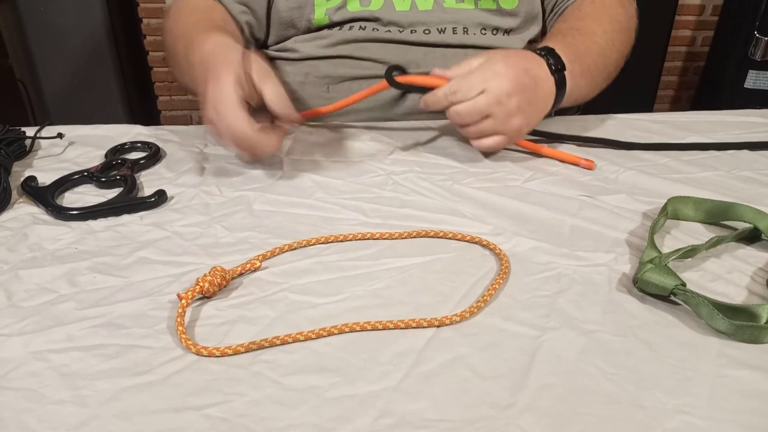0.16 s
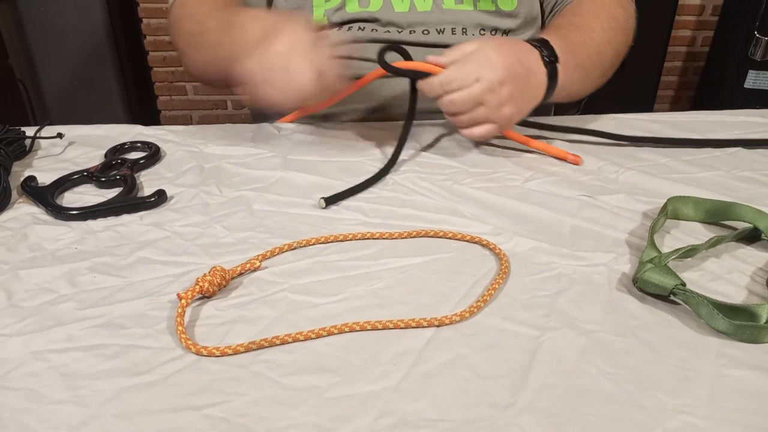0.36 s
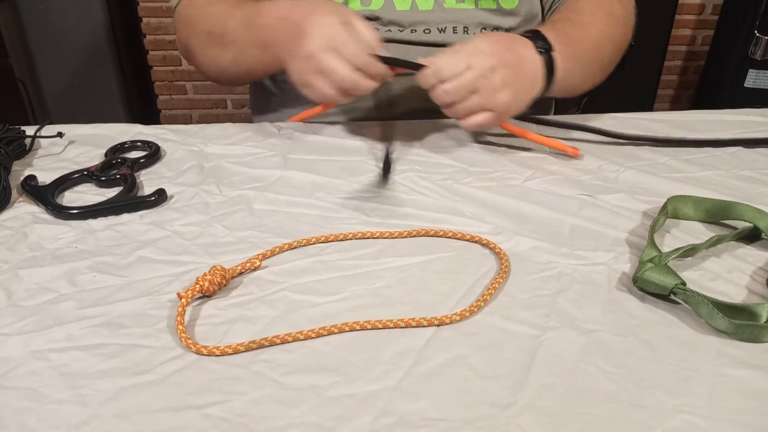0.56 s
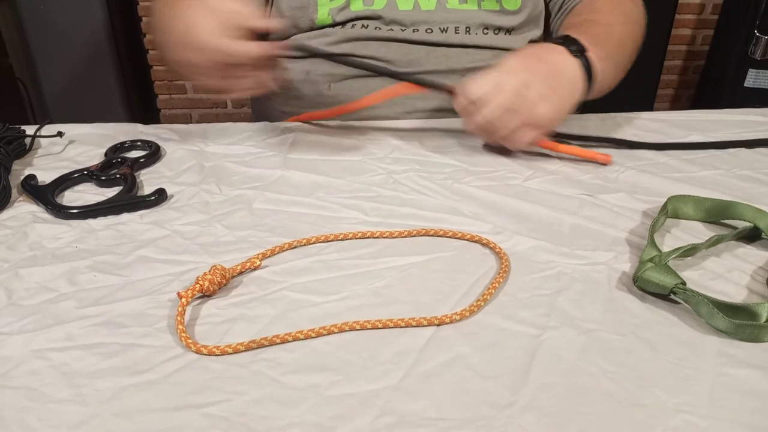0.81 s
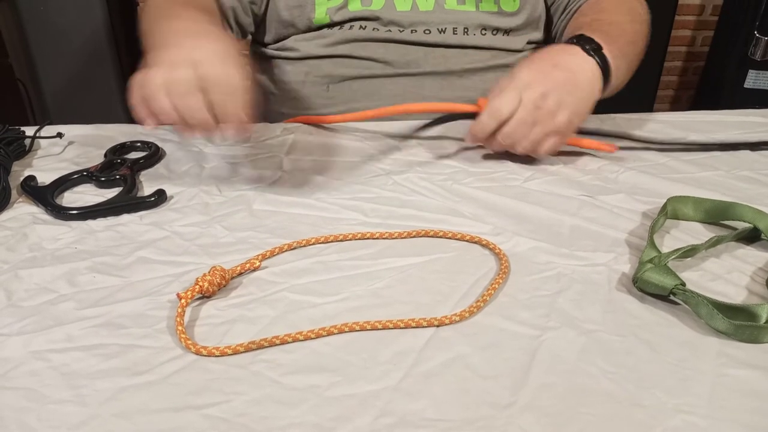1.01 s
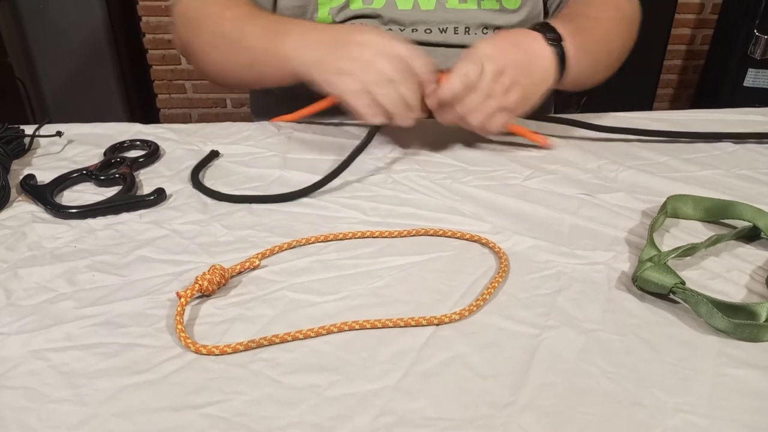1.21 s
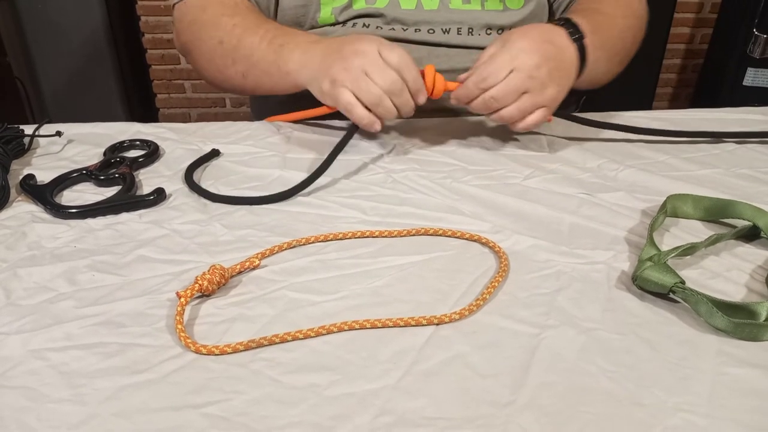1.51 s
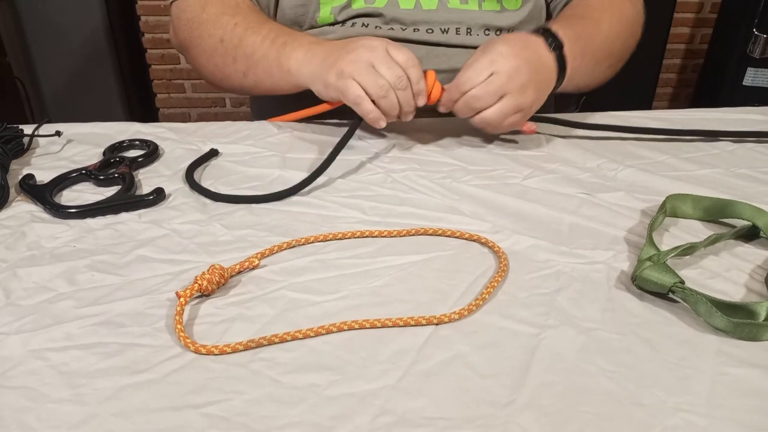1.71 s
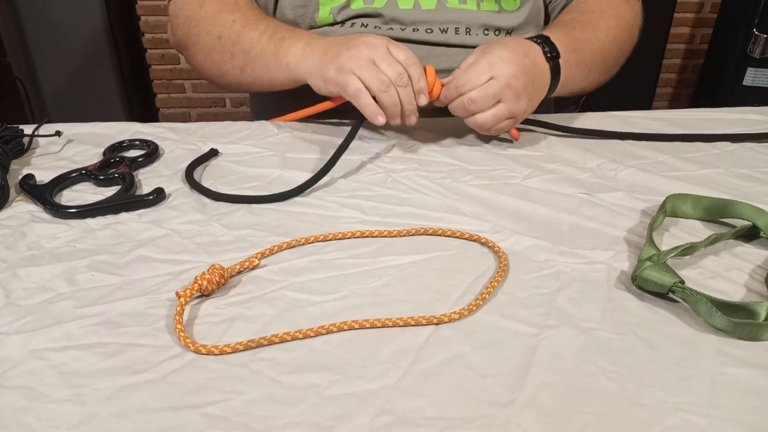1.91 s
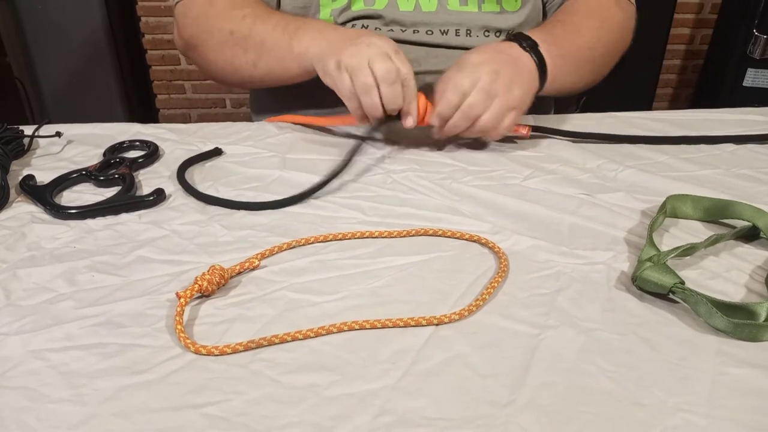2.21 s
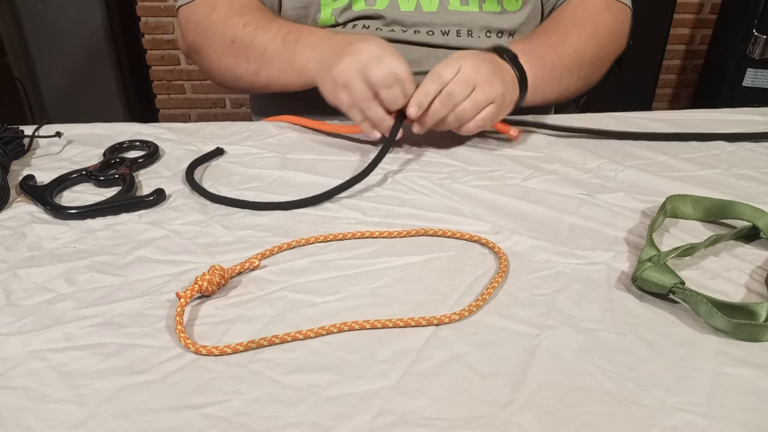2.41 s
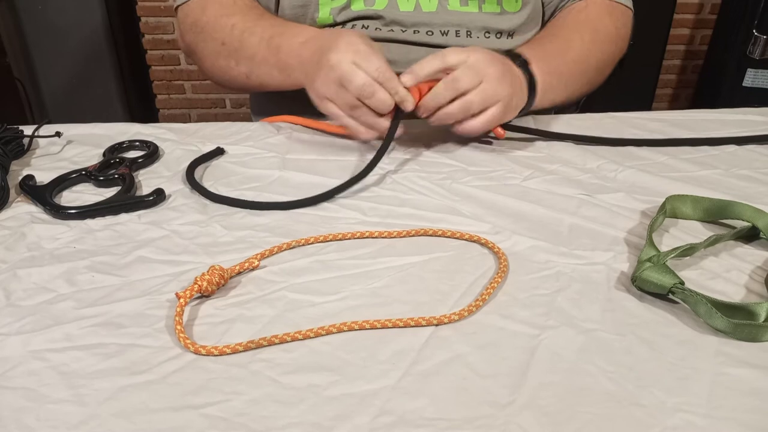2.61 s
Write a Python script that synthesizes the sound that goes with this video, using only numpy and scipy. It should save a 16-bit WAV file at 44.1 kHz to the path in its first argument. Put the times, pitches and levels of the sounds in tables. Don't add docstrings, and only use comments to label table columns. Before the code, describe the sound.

Loose rope ends drop onto a tabletop in two short bursts of hollow knocks, with a brief thin zip of sliding braid before the second, then mostly soft rustling and a few light taps; quiet, dry indoor room.

```python
import sys
import numpy as np
from scipy import signal
from scipy.fft import rfft, irfft
from scipy.io import wavfile
from scipy.ndimage import uniform_filter1d

SR = 44100
rng = np.random.default_rng(int(sys.argv[2]) if len(sys.argv) > 2 else 0)


def log_audio(samples):
    frames = np.atleast_2d(samples).T
    limited = np.clip(frames, -1, 1)
    pcm = np.round(limited * 32767).astype(np.int16)
    wavfile.write(sys.argv[1], SR, pcm)


def rack_gain(trim_db):
    fader = np.asarray(trim_db, float)
    return 10 ** (fader / 20)


N = 121275
T = np.arange(N) / SR

# start_s, body_db, boom_db, knock_db, damping (share of full ring time)
LANDINGS = [(.199, -47.5, -52, -59, .4), (0.206, -27.5, -23, -42, 0.68), (.218, -25, -33, -41, 0.57),
            (.24, -36.5, -24, -68, 0.34), (0.284, -44.5, -40, -70, 0.93), (.31, -53.5, -63.5, -67, .9),
            (0.428, -73, -47.5, -89, 0.75), (.551, -46.5, -44, -74, 0.88), (0.585, -49.5, -40, -54, 0.65),
            (.571, -58, -57, -75, .7), (.608, -48.5, -57, -69, .7), (.628, -68, -78, -72, .6),
            (.651, -57, -70, -60.5, .5), (0.737, -58.5, -67, -55, .8), (.808, -58, -53.5, -70, .6),
            (0.823, -47, -37, -55.5, 0.73), (0.871, -65.5, -49, -79, 0.74), (.945, -65, -63, -89, .6),
            (1.009, -51, -57, -54, .3), (1.014, -28.5, -28, -42, 0.72), (1.036, -33, -47, -49, 0.27),
            (1.0638, -25, -30.5, -36, 0.46), (1.115, -44.5, -41.5, -58, 0.79),
            (1.158, -48.5, -44.5, -54.5, 0.47), (1.51, -56, -67, -66, 0.45),
            (1.5305, -41.5, -36, -49, 0.69), (1.598, -63, -52, -93, 0.87), (1.7495, -41, -49.5, -95, 0.92),
            (1.788, -86, -42, -103, 0.41), (2.218, -63, -89, -71.5, 0.74), (2.43, -50, -51, -71, 0.65),
            (2.4379, -36, -30, -42.5, 0.58), (2.488, -55, -67.5, -73, .9), (0.038, -67, -80, -69, 0.3)]
# mode_hz, level_db, t60_s
BOOM_MODES = [(112, -23, 0.05), (138.2, 4.5, 0.22), (185.6, 1.5, 0.17), (232, -1, 0.24), (265, 3.5, 0.17),
              (301.8, 7.5, 0.15), (333.5, 0, 0.16)]
# mode_hz, level_db, t60_s
BODY_MODES = [(376, -2, .14), (411, 4, .16), (466, -2, .14), (535, 0, .15), (569, 4, .12), (600, 3, .11),
              (690, 1, .12), (785, -1, .13), (819, -4, .15), (891, -4, .13), (941, -3, .12),
              (1052, -6, .11), (1130, -9, .1), (1210, -11, .09)]
# mode_hz, level_db, t60_s
KNOCK_MODES = [(1308, 9.5, .07), (1450, 5.5, 0.12), (1604, -2.5, 0.12), (1850, -12, .1), (2000, -2, .1),
               (2090, 3, .11), (2160, 2, .12), (2340, 10, .055), (2440, 0, .1), (2510, 3, .12),
               (2654, 8, .045), (2730, -3.5, 0.11), (2860, -9, 0.14), (2945, -13, 0.093)]
# start_s, level_db, colour_hz, length_s
TIP_CLICKS = [(0.149, -67, 9300, 0.0032), (0.206, -42, 8900, 0.0042), (0.2184, -23.5, 8030, 0.0014),
              (0.2255, -34, 6500, 0.003), (.233, -42, 6800, .006), (0.586, -49.5, 4100, 0.0047),
              (.65, -46.5, 5900, 0.015), (0.737, -41, 2560, 0.00055), (0.742, -40.5, 2600, 0.003),
              (1.014, -54, 7400, .012), (1.0641, -23.5, 7400, 0.00097), (1.067, -23, 2780, 0.0065),
              (1.362, -64, 4200, .01), (1.488, -60, 6000, .006), (1.928, -55.5, 10500, .006),
              (2.0604, -62, 9700, .003), (2.068, -53, 9700, 0.005), (2.12, -56, 10500, .006),
              (2.157, -60, 6600, .006), (2.196, -45.5, 7400, 0.003), (2.219, -58, 6800, 0.003),
              (2.4036, -60, 9500, .005), (2.54, -63, 10500, 0.0036), (2.6585, -60, 7000, .005),
              (2.31, -61.5, 7100, 0.0051), (2.441, -47.5, 4560, 0.0084)]
# peak_s, level_db, rise_s, fall_s, colour_hz
BRAID_STROKES = [(0.044, -55, 0.039, 0.033, 11940), (0.148, -64, 0.025, 0.0093, 12500),
                 (.43, -64.5, .03, 0.044, 9700), (0.531, -58.5, 0.062, 0.026, 11200),
                 (0.591, -55, .04, 0.078, 10400), (.67, -57.5, .03, 0.15, 7900),
                 (.745, -56.5, 0.024, 0.15, 10500), (0.848, -68, 0.072, 0.017, 9200),
                 (1.119, -58.5, 0.061, 0.084, 8100), (1.2, -62, 0.012, 0.051, 9800),
                 (1.339, -63, 0.07, 0.14, 9000), (1.51, -62.5, 0.03, 0.042, 8330),
                 (1.62, -64.5, 0.024, 0.03, 9800), (1.685, -63, .015, 0.025, 10500),
                 (1.43, -77.5, .03, .02, 10500), (1.937, -60, 0.0069, .02, 10800),
                 (1.961, -55, 0.01, 0.018, 8000), (2.074, -63, 0.0079, .03, 10100),
                 (2.139, -59, 0.016, 0.07, 11600), (2.21, -78, 0.09, 0.21, 8100),
                 (2.32, -61, 0.0091, .03, 7900), (2.45, -57.5, 0.036, 0.066, 10000),
                 (2.561, -57, 0.015, .02, 11600), (2.626, -69, .01, 0.015, 8000),
                 (2.69, -56.5, 0.032, 0.021, 8000)]
# time_s, ridges_per_s, level_db
RIDGE_SLIDE = [
    (.86, 374, -20),
    (.9, 378, -2),
    (.94, 382, -2),
    (.97, 401, 0),
    (.995, 411, 0),
    (1.02, 403, 0),
    (1.05, 387, -2),
    (1.075, 378, -15),
]
# centre_hz, width_hz, level_db
FRICTION_BANDS = [(4400, 1200, -95), (6600, 1400, -83.5), (10400, 2600, -81), (12600, 1200, -89.5),
                  (15000, 1500, -95)]
# time_s, level_db
FINGER_ACTIVITY = [(0, 9), (.19, -2), (.38, -2), (.6, 11), (.88, -3.5), (.98, -7), (1.1, 11.5), (1.4, -13),
                   (1.56, -3), (1.8, 5), (1.91, -3), (2.03, -4), (2.25, 8.5), (2.38, -3), (2.5, 5),
                   (2.6, 1.5), (2.75, 4)]
# centre_hz, t60_s
ROOM_DECAY = [(120, 0.23), (500, 0.14), (2500, 0.2), (7000, 0.23), (13000, 0.037)]
# freq_hz, density_db_per_hz
HUSH_SPECTRUM = [(25, -15), (60, 0), (117, -0.5), (400, -8.5), (1700, -21), (3800, -25), (8000, -35.5),
                 (16000, -38)]
# freq_hz, gain_db
MIC_RESPONSE = [(3500, 1.5), (5200, 4), (6700, 7), (8200, -9), (10300, 7), (11800, 2), (13700, -5.5),
                (15300, 3)]


def unit(x):
    return x / np.sqrt(np.mean(x ** 2))


def curve(points, hz):
    p = np.array(points, float)
    return np.interp(np.log(np.maximum(hz, 1)), np.log(p[:, 0]), p[:, 1])


def colour(x, points):
    log_gain = curve(points, np.fft.rfftfreq(4096, 1 / SR)) * np.log(10) / 20
    cepstrum = irfft(log_gain)
    cepstrum[1:2048] *= 2
    cepstrum[2049:] = 0
    impulse = irfft(np.exp(rfft(cepstrum)))
    return signal.fftconvolve(x, impulse)[:len(x)]


def reson(x, hz, width_hz):
    b, a = signal.iirpeak(min(hz, .45 * SR), hz / width_hz, fs=SR)
    return signal.lfilter(b, a, x)


def walk(rate_hz):
    k = int(SR / rate_hz)
    steps = np.repeat(rng.standard_normal(N // 50), k)[:N]
    return unit(uniform_filter1d(uniform_filter1d(steps, k), k))


def crackle(grain_db):
    return rng.standard_normal(N) * rack_gain(grain_db * rng.exponential(size=N))


def ring(hz, db, t60_s, rise_s, chance):
    scatter_db, slur_rad, drift = 1.5, .4, .02
    t = T[:SR // 4, None]
    phase = 2 * np.pi * hz * (1 + drift * chance[2]) * t + slur_rad * chance[0]
    waves = np.sin(phase) * rack_gain(db + scatter_db * chance[1] - 60 * t / t60_s)
    onset = 1 - np.exp(-(t[:, 0] / rise_s) ** 2)
    return waves.sum(axis=1) * onset / np.sqrt(len(hz))


def thumps():
    below_share = .35
    # modes, rise_s, heart_hz (where soft landings gather), focus_db (lost per octave away)
    parts = [(np.array(BOOM_MODES).T, 0.0016, 150, 7),
             (np.array(BODY_MODES).T, 0.00063, 540, 9),
             (np.array(KNOCK_MODES).T, 0.00064, 2330, 35)]
    out = np.zeros(N + SR)
    chance = rng.standard_normal((40, 3, 3, 14))
    for (start_s, body_db, boom_db, knock_db, damping), luck in zip(LANDINGS, chance):
        soft = np.clip((-30 - body_db) / 10, 0, 1)
        i = int(start_s * SR)
        levels_db = (boom_db, body_db, knock_db)
        for (modes, rise_s, heart_hz, focus_db), level_db, draw in zip(parts, levels_db, luck):
            hz, mode_db, t60_s = modes
            octaves = np.log2(hz / heart_hz)
            loss_db = focus_db * soft * np.maximum(octaves, -below_share * octaves)
            db = mode_db + level_db - loss_db
            sound = ring(hz, db, t60_s * max(damping, .1), rise_s * (1 + soft), draw[:, :len(hz)])
            out[i:i + len(sound)] -= sound
    return signal.sosfilt(signal.butter(3, 105, "high", fs=SR, output="sos"), out[:N])


def ticks():
    snap_s = .004
    out = np.zeros(N + SR)
    patters = rng.standard_normal((40, SR // 20))
    for (start_s, db, hz, length_s), patter in zip(TIP_CLICKS, patters):
        impacts = np.r_[-snap_s / length_s, patter]
        decay = np.exp(-np.arange(len(impacts)) / (max(length_s, 2e-4) * SR))
        width_hz = hz * (.18 + .0005 / length_s)
        click = reson(reson(impacts * decay, hz, width_hz), hz, hz * 1.8)
        i = int(start_s * SR)
        out[i:i + len(click)] += rack_gain(db) * click
    return out[:N]


def rustle():
    grain_db, flicker_db = 2.0, 2.5
    grains = unit(crackle(grain_db)) * rack_gain(flicker_db * walk(60))
    out = np.zeros(N)
    for peak_s, db, rise_s, fall_s, hz in BRAID_STROKES:
        a = max(int((peak_s - 5 * rise_s) * SR), 0)
        b = min(int((peak_s + 7 * fall_s) * SR), N)
        d = T[a:b] - peak_s
        swell = np.where(d < 0, np.exp(-(d / rise_s) ** 2), 1 / np.cosh(2.22 * d / fall_s))
        stroke = reson(grains[a:b] * swell, hz, hz * 0.73)
        out[a:b] += rack_gain(db) * reson(stroke, hz, hz * 0.99)
    return out


def sing():
    level_db, centre_hz, width_hz, roughness = -73, 10900, 560, .0016
    time_s, rate, db = np.array(RIDGE_SLIDE, float).T

    def smooth(v):
        return uniform_filter1d(np.interp(T, time_s, v), SR // 60)

    f0 = smooth(rate) * (1 + roughness * walk(150))
    phase = 2 * np.pi * np.cumsum(f0) / SR
    moving_hz = centre_hz * f0 / 395
    tone = np.zeros(N)
    for k in range(23, 31):
        weight = np.exp(-((k * f0 - moving_hz) / width_hz) ** 2)
        tone += weight * rack_gain(2.7 * walk(40)) * np.sin(k * phase + k * k)
    return tone * rack_gain(level_db + smooth(db)) * (T > time_s[0]) * (T < time_s[-1])


def fidget():
    swing_db, flutter_db, grain_db = 2.5, 1.5, 2.5
    busy_db = np.interp(T, *np.array(FINGER_ACTIVITY).T) + flutter_db * walk(45)
    out = np.zeros(N)
    for hz, width_hz, db in FRICTION_BANDS:
        band = reson(reson(crackle(grain_db), hz, width_hz), hz, width_hz)
        out += unit(band) * rack_gain(db + busy_db + swing_db * walk(32))
    return out


def room(x):
    wet_db, first_echo_s = -10, 0.011
    t = T[:SR // 2]
    tail = np.zeros(len(t))
    for hz in 100 * 2 ** np.arange(0, 7.6, .5):
        band = reson(rng.standard_normal(len(t)), hz, hz * 0.49)
        tail += band * rack_gain(-60 * t / curve(ROOM_DECAY, hz))
    tail *= 1 - np.exp(-t / first_echo_s)
    tail /= np.sqrt(np.sum(tail ** 2))
    return x + rack_gain(wet_db) * signal.fftconvolve(x, tail)[:N]


def air():
    hush_db, drone_db, drone_hz = -75, -74, 113
    hush = unit(colour(rng.standard_normal(N), HUSH_SPECTRUM)) * rack_gain(hush_db + 1.0 * walk(1.9))
    drone = reson(reson(rng.standard_normal(N), drone_hz, 11), drone_hz, 40)
    return hush + unit(drone) * rack_gain(drone_db + 1.5 * walk(5))


def scene():
    contacts = thumps() + ticks() + rustle() + sing()
    return (room(contacts) + fidget() + air())[None]


def top_cut(x):
    return signal.sosfilt(signal.butter(12, 16660, fs=SR, output="sos"), x)


def record(dry):
    x = colour(dry[0], MIC_RESPONSE)
    x = signal.sosfilt(signal.butter(1, 60, "high", fs=SR, output="sos"), x)
    x = signal.sosfilt(signal.ellip(8, .5, 35, 15900, fs=SR, output="sos"), x)
    return top_cut(x[None])


dry = scene()
out = record(dry)
log_audio(out)
```